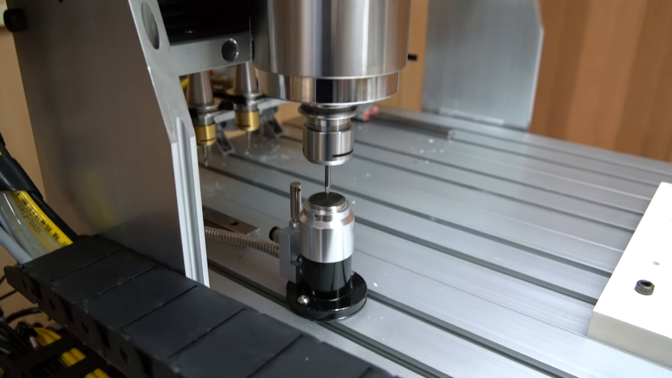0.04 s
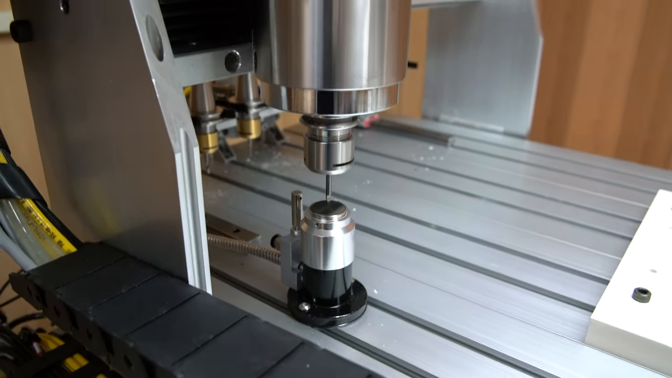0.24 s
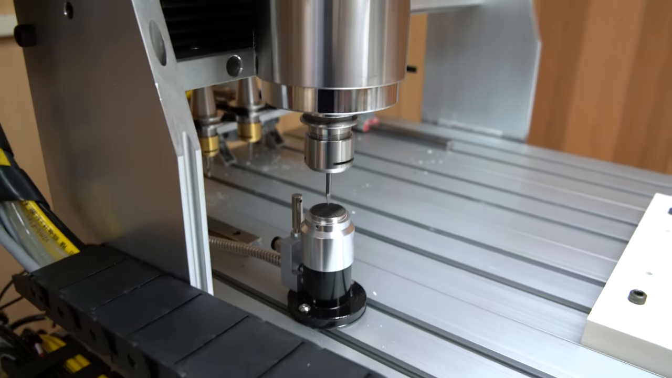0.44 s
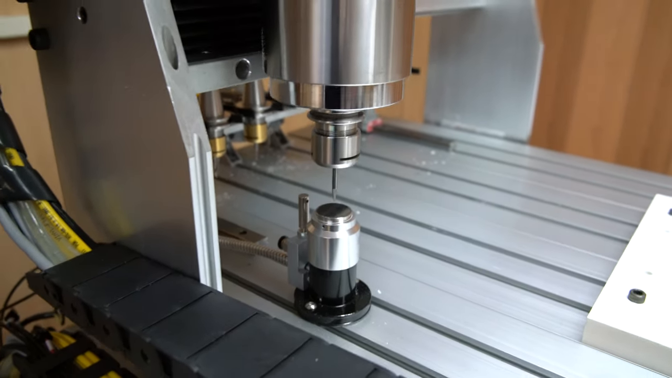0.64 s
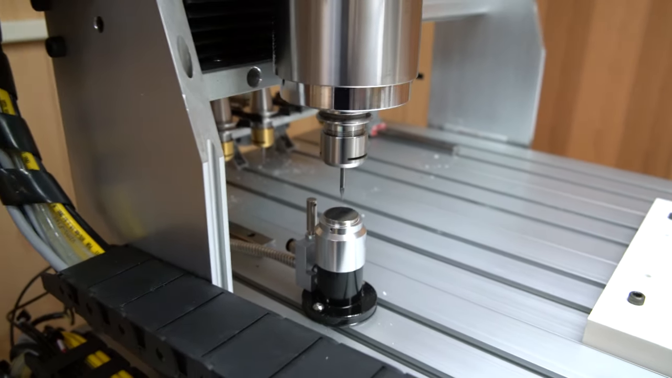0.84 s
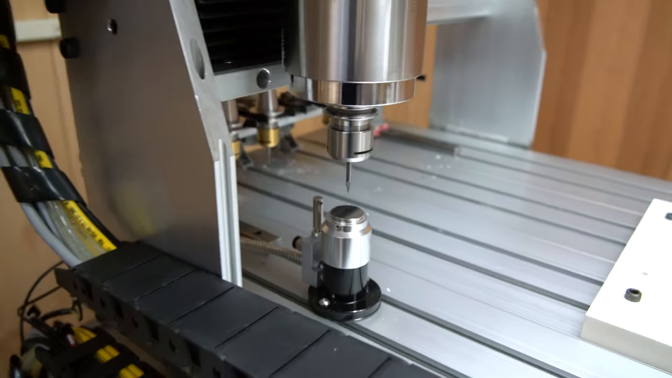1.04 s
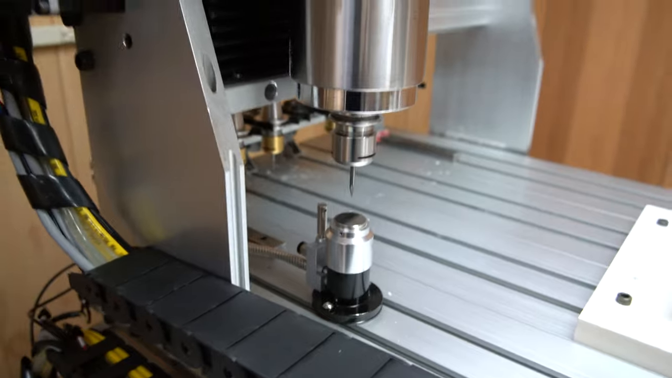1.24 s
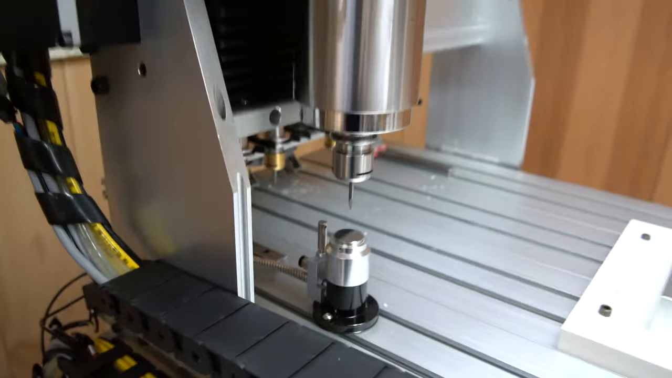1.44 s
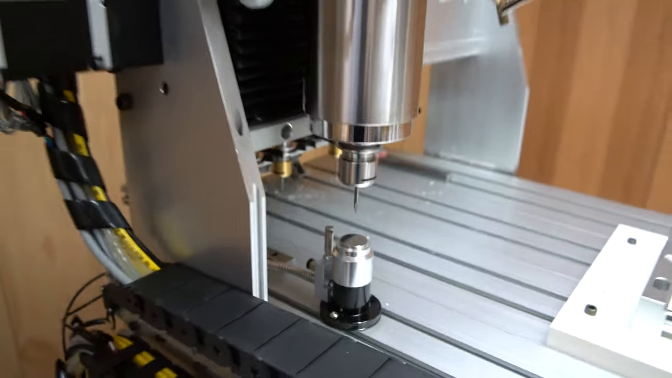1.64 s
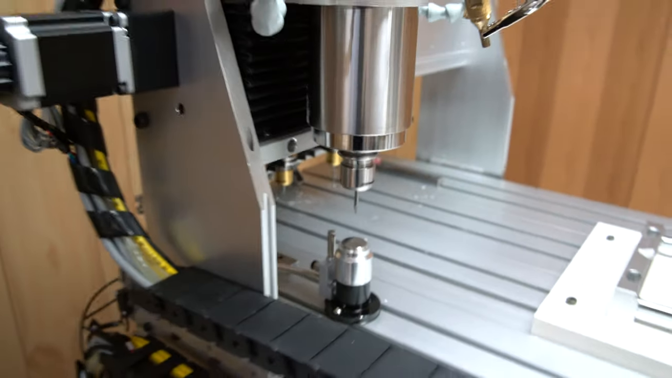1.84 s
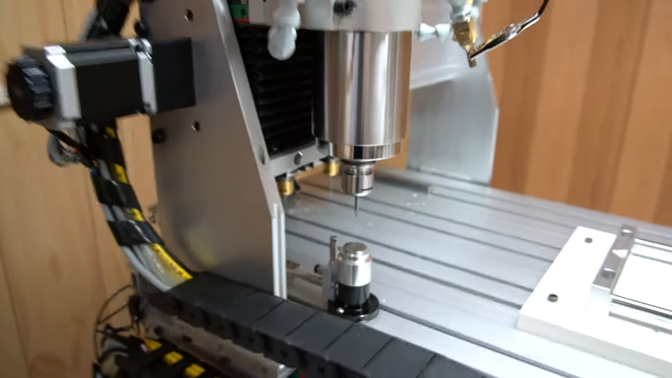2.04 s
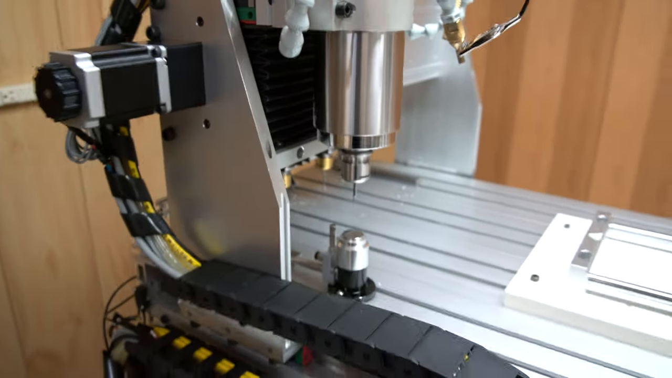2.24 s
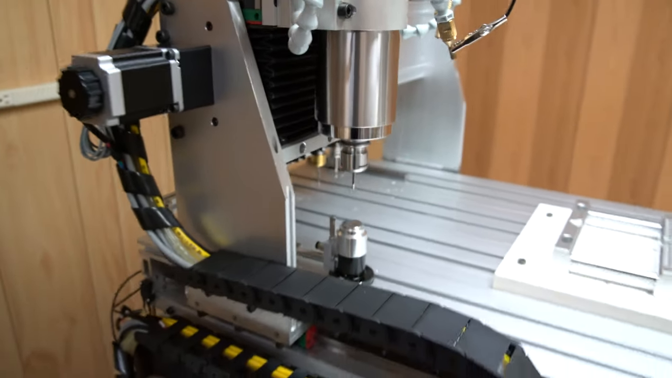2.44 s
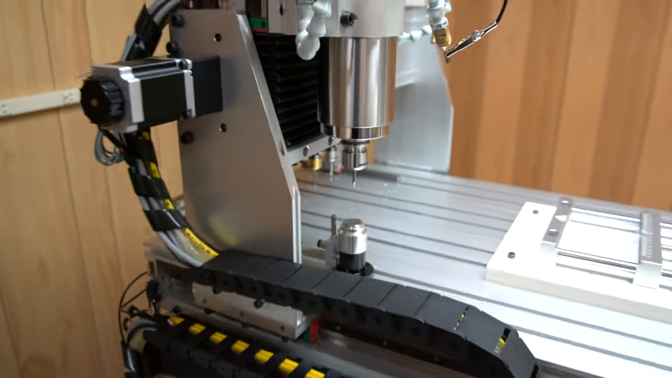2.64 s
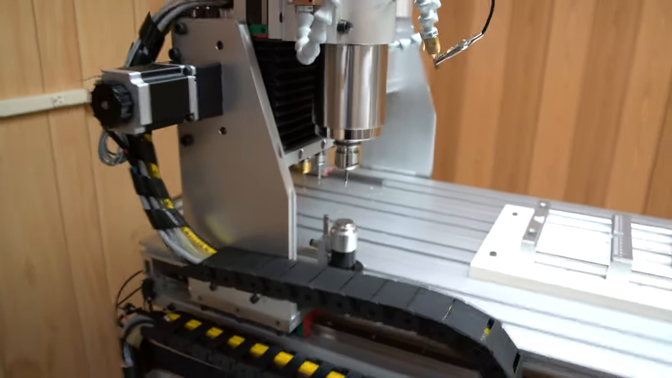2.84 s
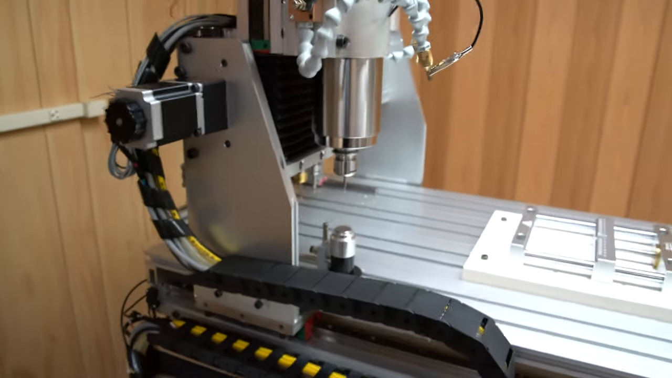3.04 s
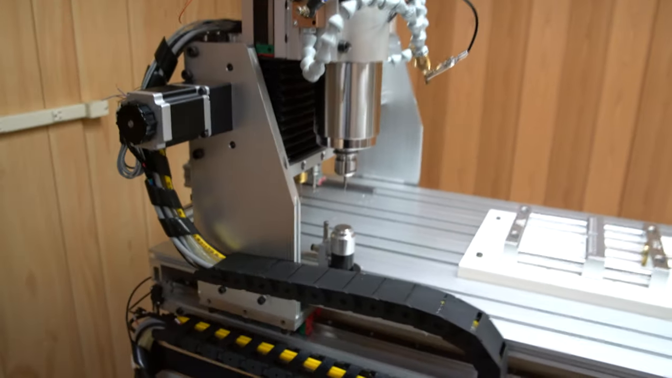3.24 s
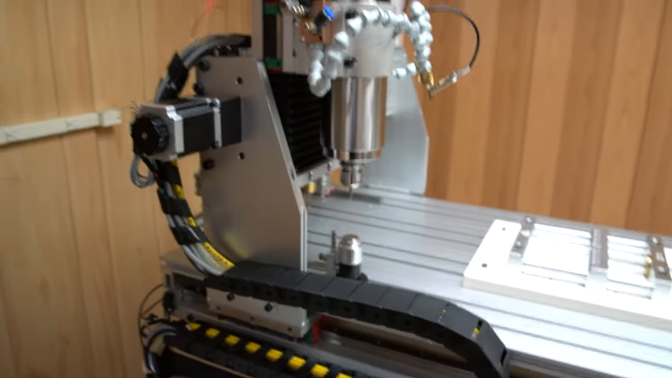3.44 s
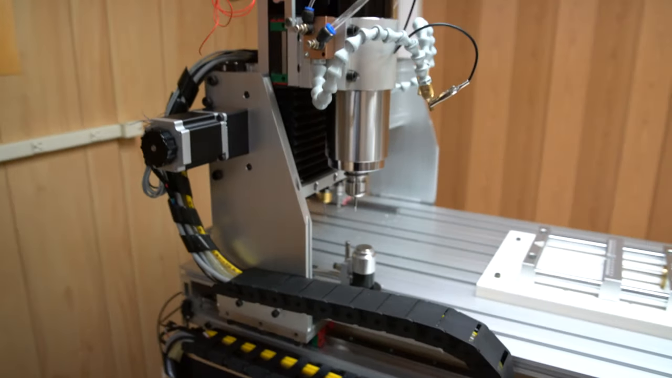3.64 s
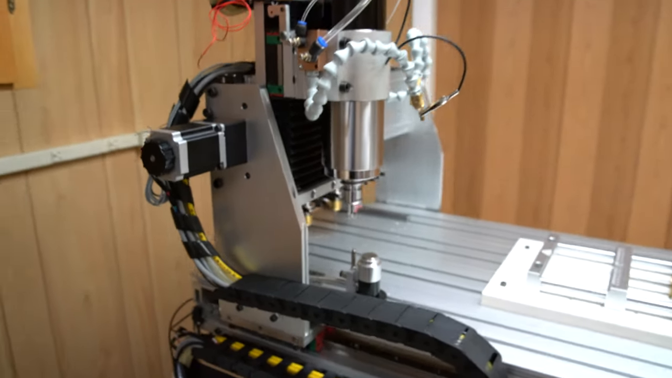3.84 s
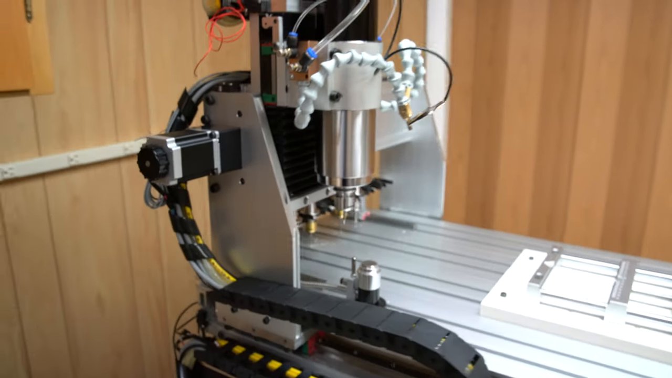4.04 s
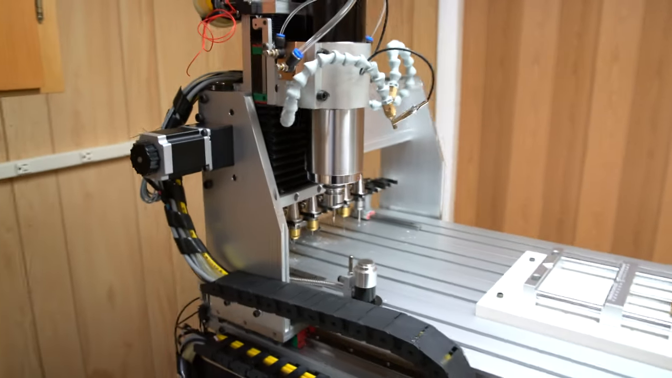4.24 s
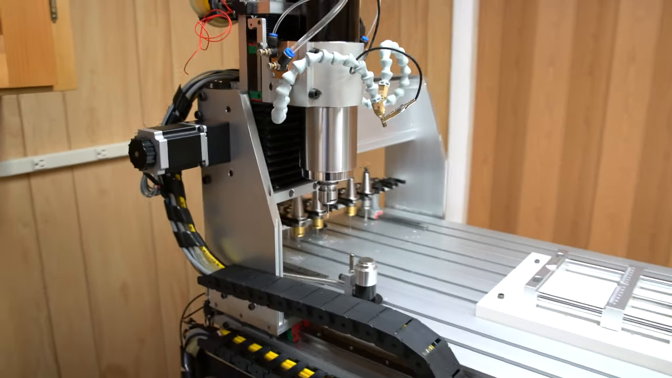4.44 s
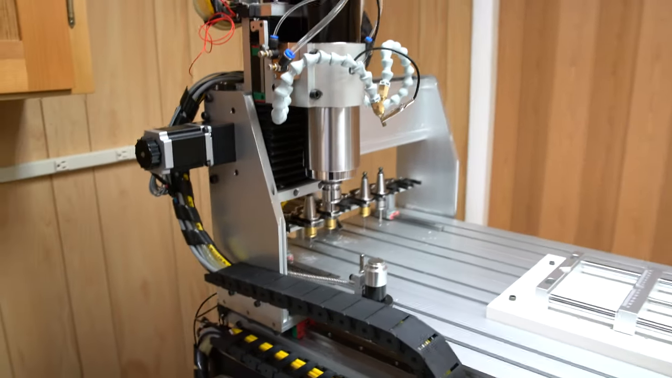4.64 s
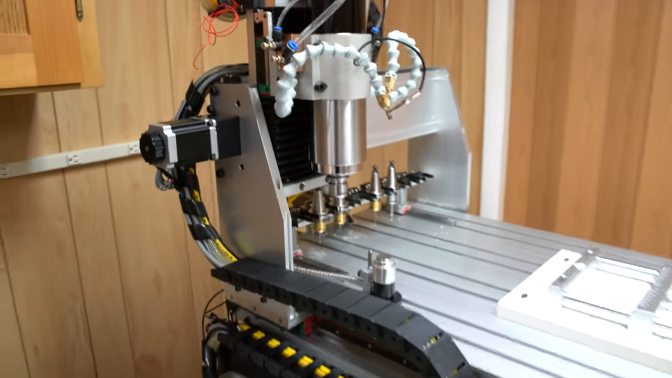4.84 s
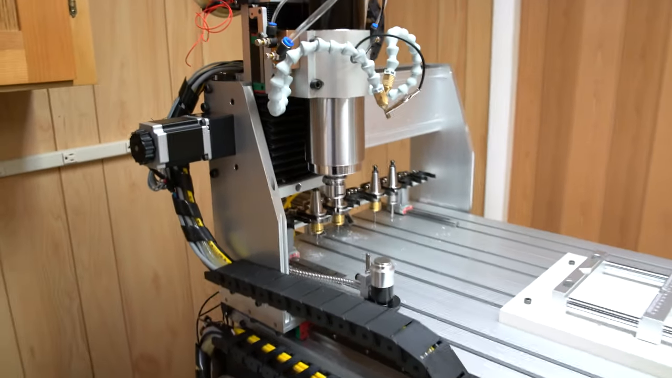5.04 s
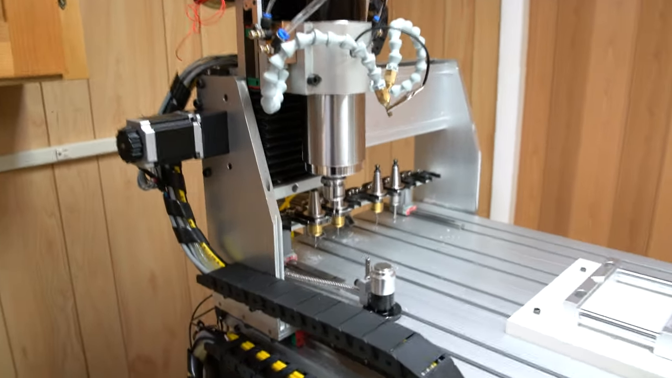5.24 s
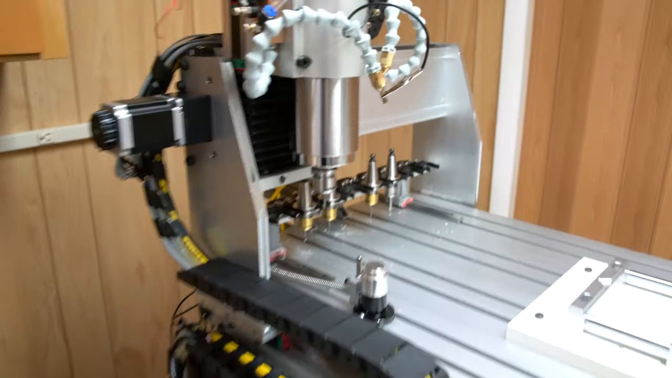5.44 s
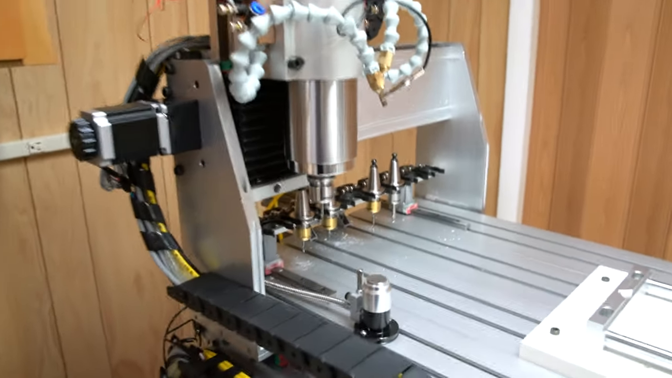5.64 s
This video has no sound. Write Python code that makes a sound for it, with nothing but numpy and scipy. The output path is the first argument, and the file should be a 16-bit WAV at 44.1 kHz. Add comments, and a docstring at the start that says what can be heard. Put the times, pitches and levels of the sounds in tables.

```python
"""A cooling fan hums in a wood-panelled workshop, close to a small CNC router just left of the right-hand side's
stronger pickup: its stepper lifts the spindle with a steady whine, then the gantry makes a fast, rattling traverse.
Motor tones are sines tied to shaft speed; air, screw and guides are shaped noise. On every speed ramp torque ripple
sweeps through the frame's resonances; jolts and clicks are short noise bursts, and thin squeaks come last."""
import sys
import numpy as np
from scipy import signal
from scipy.fft import rfft, irfft
from scipy.io import wavfile
from scipy.ndimage import uniform_filter1d

SR = 44100
rng = np.random.default_rng(int(sys.argv[2]) if len(sys.argv) > 2 else 0)


def waveform_to_disk(signal):
    """Save audio, clipped to [-1, 1], as 16-bit WAV at the path in sys.argv[1]."""
    frames = np.transpose(np.atleast_2d(signal))
    scaled = np.clip(frames, -1, 1) * 32767
    samples = np.round(scaled).astype(np.int16)
    wavfile.write(sys.argv[1], SR, samples)


N = 251370
T = np.arange(N) / SR
BINS = np.maximum(np.arange(N // 2 + 1) * SR / N, 1)  # spectrum frequencies, Hz
SIDES = np.array([[1], [-1]])  # left, right

# shaft speed of each move: t/s, share of full speed
LIFT_SPEED = [(.309, 0), (.366, 1), (3.094, 1), (3.158, 0)]
TRAVERSE_SPEED = [(3.386, 0), (3.597, 1), (4.62, 1), (4.83, 0)]
# coil frequencies at full speed, and coil cycles in one shaft turn
LIFT_COIL_HZ, TRAVERSE_COIL_HZ, CYCLES_PER_TURN = 166.64, 666.5, 50
# shudders as the gantry sets off, brakes and halts:
# t/s, growl level/dB, rattle level/dB against full speed before trim, rattle decay constant/s
SHUDDERS = [(3.4, -23.5, -4.5, 0.021), (4.761, -24.5, -21, 0.018), (4.831, -24, -8, .035)]
# stereo width of the sound field: f/Hz, side minus mid level/dB
WIDTH = [(60, -15.5), (250, -19.5), (600, -13.5), (1000, -9), (2000, -2), (4000, 0.5), (12000, 0.5)]


def undb(db):
    """Decibels to gain."""
    return 10 ** (np.asarray(db) / 20)


def curves(table):
    """Each column of a timed table, sample by sample."""
    s, *columns = np.transpose(table)
    return [np.interp(T, s, c) for c in columns]


def gain_at(points, hz):
    """Gain of a (Hz, dB) spectrum at the given frequencies."""
    f, db = np.transpose(points)
    return undb(np.interp(np.log(hz), np.log(f), db))


def walk(rate):
    """Smooth random drift, spread near 1: held random steps at the given rate in Hz, averaged twice."""
    k = int(SR / rate)
    held = np.repeat(rng.standard_normal(N // k + 2), k)[rng.integers(k):]
    return 1.3 * uniform_filter1d(uniform_filter1d(held, k), k)[:N]


def lag(drive, seconds):
    """Level of a vibration that builds up and dies away behind its drive."""
    keep = np.exp(-1 / (seconds * SR))
    return signal.lfilter([1 - keep], [1, -keep], drive)


def spread(mid, side):
    """Left and right from two unrelated signals: bass alike, treble apart."""
    return mid + SIDES * irfft(rfft(side) * gain_at(WIDTH, BINS), N)


def colour(white, points):
    """Stereo noise with a given density (Hz, dB per Hz) from a pair of white noises."""
    mid, side = irfft(rfft(white) * gain_at(points, BINS) * np.sqrt(SR / 2), N)
    return spread(mid, side)


def resonate(x, modes):
    """Sum of damped resonances (Hz, width Hz, peak dB) driven by x."""
    response = sum(undb(db) / (1 + 1j * (BINS / hz - hz / BINS) * hz / width) for hz, width, db in modes)
    return irfft(rfft(x) * response, N)


def cycles(hz):
    """Running phase in radians."""
    return 2 * np.pi * np.cumsum(hz) / SR


def tone(hz, speed, wander, rough):
    """One machine tone; the microphone drifts through its standing waves, so level and side keep shifting."""
    mid = 1 + wander * (walk(3.08) + 1j * walk(3.03)) + rough * walk(45)
    mid = mid / np.sqrt(1 + 2 * wander ** 2)
    side = gain_at(WIDTH, hz) * (0.17 * walk(3.94) + .8j * walk(2.85))
    phase = cycles(hz * speed) + rng.uniform(0, 2 * np.pi)
    return np.sqrt(2) * np.real((mid + SIDES * side) * np.exp(1j * phase))


def per_turn(coil_hz, crest_s):
    """A swing between -1 and 1, once per shaft turn, with a crest at crest_s."""
    return np.cos(2 * np.pi * (T - crest_s) * coil_hz / CYCLES_PER_TURN)


def workshop():
    """Steady fan and idle-driver hum over the broad noise of the air."""
    # fan and idle drivers: f/Hz, level/dB
    fan = [(290.7, -51), (376.8, -66), (581.4, -56), (872.1, -64), (1163, -69), (1394, -68), (1572, -70),
           (1696, -73), (3720, -81), (5787, -80), (8974, -81), (10465, -82), (12758, -83), (13108, -83),
           (15547, -86)]
    # air noise: f/Hz, density/dB per Hz
    shop = [(25, -69), (50, -73), (100, -78), (150, -83), (240, -75), (350, -80), (480, -82.5), (900, -82),
            (1500, -86.5), (2100, -94), (3500, -97), (6000, -99.5), (13000, -102), (15500, -103)]
    hum = sum(undb(db) * tone(hz, np.ones(N), wander=0.33, rough=0.13) for hz, db in fan)
    return hum + colour(rng.standard_normal((2, N)) * undb(0.31 * walk(9.9)), shop)


def lift_lead(speed):
    """The lift's three leading tones build up at full speed; the full-step tone swells with each turn."""
    # full-step tone: t/s, level/dB
    step_level = [(.55, -38), (1.3, -39.5), (1.8, -36), (2.4, -33.5), (3.05, -37)]
    # tone that beats above it: t/s, level/dB before trim
    beat_level = [(0.42, -52), (0.5, -50), (0.72, -64), (0.8, -52), (1.85, -40), (2.43, -41.5),
                  (2.49, -51.5), (2.66, -60), (2.72, -49), (3.08, -47)]
    # microstep whistle: t/s, level/dB before trim
    microstep_level = [(0.42, -60), (0.49, -56), (0.88, -63.5), (1.0, -76), (1.03, -63), (1.13, -84),
                       (1.45, -58.5), (1.72, -67), (2.27, -71), (2.35, -57.5), (3.08, -67)]
    swell_db = 1.46 * per_turn(LIFT_COIL_HZ, crest_s=2.069)
    step = undb(curves(step_level)[0] + swell_db) * tone(666.5, np.ones(N), wander=.03, rough=0.09)
    beat = undb(curves(beat_level)[0] + 1.6) * tone(776.3, np.ones(N), wander=.03, rough=0.072)
    whistle = undb(curves(microstep_level)[0] + 4.5) * tone(5332, np.ones(N), wander=0.11, rough=0.3)
    # the two lower tones die away faster than they build up
    singing = np.minimum(lag(speed ** 4, seconds=0.044), lag(speed ** 4, seconds=.014))
    return singing * (step + beat) + speed ** 20 * whistle


def chain_rustle(speed):
    """Dry rustle of the cable chain: band noise with a flickering level, stronger as the lift brakes and
    settles."""
    # rustle colour, later scaled to unit level: f/Hz, relative density/dB
    friction = [(900, -23), (1500, -8), (2200, 4.5), (3000, -2), (4200, -4), (7000, -30)]
    # it fades after the start and jumps up near the top: t/s, level/dB before trim
    rustle_level = [(.34, -52), (.5, -58), (.9, -62), (2.25, -66), (2.37, -52.5), (2.8, -53.5),
                    (3.1, -53.5)]
    brake_db = 8 * (1 - speed) * (T > LIFT_SPEED[2][0])
    grains = colour(rng.standard_normal((2, N)) * undb(3.5 * walk(70)), friction)
    return grains / np.std(grains) * undb(curves(rustle_level)[0] + brake_db - 3.5)


def screw_rumble(speed):
    """Low noise and throb of the lead screw, slowly fading and dipping at even intervals."""
    # rumble before its fade: f/Hz, density/dB per Hz
    low_noise = [(25, -67.5), (40, -69.5), (54, -62), (68, -69), (85, -60.5), (130, -84), (400, -130)]
    dip_s, dip_every_s = 1.51, .53
    dips = np.cos(np.pi * (T - dip_s) / dip_every_s) ** 20
    rumble_db = 2 - 1.1 * (T - LIFT_SPEED[0][0]) - 5 * dips
    rumble = colour(rng.standard_normal((2, N)), low_noise) * undb(rumble_db)
    throb = undb(rumble_db - 48) * tone(53.3, speed, wander=0.19, rough=0.17)
    return rumble + throb


def lift():
    """The spindle rises: step tones, a comb of driver whine, the rumbling lead screw and the rustling cable
    chain."""
    # weaker motor and driver tones at full speed: f/Hz, level/dB before trim
    lift_tones = [(1333, -63), (1629, -67), (1685, -68), (4388, -71), (4559, -66), (4665, -64), (4999, -71),
                  (5165, -66), (5499, -64), (5665, -71), (5831, -65), (5942, -68), (6106, -69), (6276, -65),
                  (6441, -77), (6719, -71), (6884, -75), (7052, -76), (8333, -77), (8439, -73), (9552, -78),
                  (9900, -77), (10053, -78), (10329, -70), (10498, -69), (10662, -70), (10829, -66),
                  (10994, -69), (11103, -67), (11275, -70), (11438, -74), (11609, -67), (11770, -63),
                  (11880, -73), (11938, -74), (12546, -69), (12654, -76), (13205, -72), (13322, -76),
                  (15662, -75)]
    # screw noise: f/Hz, density/dB per Hz
    lift_noise = [(110, -90.5), (220, -73.5), (450, -84.5), (700, -79.5), (1000, -86.5), (1500, -86.5),
                  (2000, -96.5), (3600, -103), (4500, -98), (8000, -100), (13000, -100.5), (15500, -106)]
    speed, = curves(LIFT_SPEED)
    whine = sum(undb(db) * tone(hz, speed, wander=0.83, rough=0.72) for hz, db in lift_tones)
    whine = undb(0.5) * speed ** 6 * whine
    screw = colour(rng.standard_normal((2, N)) * undb(0.51 * walk(39.98)), lift_noise)
    # the table keeps trembling for a moment after the screw stops
    trembling = np.maximum(speed, lag(speed, seconds=0.11))
    return lift_lead(speed) + whine + trembling * (screw + chain_rustle(speed) + screw_rumble(speed))


def burst(s, db, decay):
    """A short puff of contact noise that falls 60 dB in the decay time."""
    return rng.standard_normal(N) * (T >= s) * undb(db - 60 * np.maximum(T - s, 0) / decay)


def jolt(s, push_db, chatter_db, decay, contact_s=0.00017):
    """A soft push as the play in the drive closes, then brief chatter."""
    push = undb(push_db) * np.exp(-.5 * ((T - s) / contact_s) ** 2)
    return push + burst(s, chatter_db, decay)


def frame(coil_hz, speed, ripple, jolts, modes, smooth_db):
    """Torque ripple and jolts ring the frame; near full speed the coils smooth the ripple away."""
    # the rotor judders about its commanded angle, which smears the high orders into noise
    judder = speed ** .5 * (.12 * walk(2500) + .075 * walk(250))
    phase = cycles(coil_hz * speed) + judder
    force = sum(np.sqrt(2) * undb(db) * np.sin(k * phase) for k, db in ripple)
    force = force * np.minimum(10 * speed, 1) * undb(smooth_db * speed ** 20)
    return resonate(force + sum(jolt(*row) for row in jolts), modes)


def carriage():
    """The spindle carriage rings as the lift's torque ripple and jolts pass through its resonances."""
    # torque ripple before smoothing: multiple of the coil frequency, level/dB
    ripple = [(4, -29.5), (32, -32)]
    # jolts as it takes up or loses speed: t/s, push/dB, chatter/dB, time to fall 60 dB/s
    jolts = [(.317, -10, -20.5, 0.15), (3.141, -33, -30, 0.93)]
    # resonances: f/Hz, width/Hz, peak gain/dB
    modes = [(774, 57, -5), (987, 56, 6), (1125, 110, -7), (1600, 94, -25), (2920, 20, -8.5),
             (4330, 165, -10), (4620, 100, -9.5), (6900, 810, -33), (13200, 600, -24)]
    return frame(LIFT_COIL_HZ, curves(LIFT_SPEED)[0], ripple, jolts, modes, smooth_db=-14)


def clicks():
    """Small clicks, most at the stops, as of couplings and cable chain: noise bursts through one resonance."""
    # t/s, burst level/dB before the resonance, centre f/Hz, width/Hz, time to fall 60 dB/s
    click_table = [(2.295, -30.5, 3300, 1200, 0.027), (2.611, -37, 3200, 2500, .04),
                   (3.131, -33, 8000, 11000, 0.023), (3.132, -37, 3000, 5000, 0.074),
                   (4.807, -35, 4970, 12000, 0.1), (4.823, -47, 10000, 9000, 0.29),
                   (4.938, -38, 10100, 5000, 0.013), (4.984, -45, 6500, 3000, 0.025),
                   (5.132, -48, 10000, 5000, 0.13), (5.162, -47, 9000, 6000, .06),
                   (5.333, -49, 8500, 3000, .05)]
    return sum(resonate(burst(s, db, decay), [(hz, width, 0)]) for s, db, hz, width, decay in click_table)


def braking():
    """1 while the gantry slows down, else 0, with soft edges."""
    slowing = (T > TRAVERSE_SPEED[2][0]) & (T < TRAVERSE_SPEED[3][0])
    return lag(1. * slowing, seconds=.005)


def gantry():
    """The gantry frame rings from torque ripple and jolts, louder while it brakes."""
    # torque ripple before smoothing: multiple of the coil frequency, level/dB
    ripple = [(1, -27.5), (2, -34), (3, -26.5), (4, -23), (8, -37.5), (32, -33.5)]
    # jolts as it takes up or loses speed: t/s, push/dB, chatter/dB, time to fall 60 dB/s
    jolts = [(3.383, -3, -28, 0.042), (4.612, -2, -26, .015), (4.779, -10, -28, .04),
             (4.829, -1, -19, 0.044)]
    # resonances before the braking gain: f/Hz, width/Hz, peak gain/dB
    modes = [(309, 14, -14), (438, 10.5, -9), (651, 18, -1), (894, 22, -27), (980, 48, -9), (1490, 23, -25),
             (1826, 93, -8), (2113, 47, -2.5), (2270, 290, -15.5), (4540, 1100, -15), (7240, 4800, -25.5),
             (12000, 860, -20)]
    ringing = frame(TRAVERSE_COIL_HZ, curves(TRAVERSE_SPEED)[0], ripple, jolts, modes, smooth_db=-21)
    return ringing * undb(2.5 * braking())


def shudder(s, fall_s):
    """Envelope that rises quickly to 1 at s and dies away."""
    rise_s = 0.0036
    return np.exp(-(np.minimum(T - s, 0) / rise_s) ** 2 - np.maximum(T - s, 0) / fall_s)


def growl():
    """The gantry's main mode, shaken by coil harmonics sweeping through it and by the shudders."""
    # harmonics that shake it: multiple of the coil frequency, level/dB speeding up, level/dB braking
    growl_orders = [(2, -24, -30), (3, -22, -44), (4, -21.5, -24), (8, -26, -18)]
    mode_hz, width_hz = 901, 91
    speed, = curves(TRAVERSE_SPEED)
    slowing = T > TRAVERSE_SPEED[2][0]
    drive = np.zeros(N)
    for k, up_db, down_db in growl_orders:
        closeness = np.exp(-((k * TRAVERSE_COIL_HZ * speed - mode_hz) / width_hz) ** 2)
        drive += undb(np.where(slowing, down_db, up_db)) * closeness
    swing = lag(drive, seconds=0.018) + sum(undb(db) * shudder(s, fall_s=0.0036) for s, db, _, _ in SHUDDERS)
    # a weaker, slower ring outlasts the growl
    swing = swing + undb(-5) * lag(swing, seconds=0.054)
    return swing * tone(mode_hz, 1 + 0.012 * walk(150), wander=.03, rough=0.2)


def traverse_lead(speed):
    """The gantry's leading tones build up near full speed and ring on briefly; the coil tone throbs each turn."""
    # multiples of the coil frequency
    harmonics = (4, 5, 7)
    # their levels before trim: t/s, fourth level/dB, fifth level/dB, seventh level/dB
    harmonic_levels = [(3.62, -39.5, -65, -60), (3.8, -47, -71, -56.5), (3.93, -45.5, -66, -51),
                       (4.07, -39.5, -58, -62), (4.22, -40.5, -55, -70), (4.33, -46, -57, -64),
                       (4.46, -39, -61, -70), (4.6, -37.5, -60, -65)]
    howl = undb(-26) * tone(824.7, np.ones(N), wander=0.052, rough=.08)
    coil_db = -34 + 2 * per_turn(TRAVERSE_COIL_HZ, crest_s=4.14)
    coil = undb(coil_db) * tone(TRAVERSE_COIL_HZ, np.ones(N), wander=0.22, rough=0.13)
    upper = sum(undb(db + 3.0) * tone(k * TRAVERSE_COIL_HZ, np.ones(N), wander=0.065, rough=0.13)
                for k, db in zip(harmonics, curves(harmonic_levels)))
    return lag(speed ** 20, seconds=.016) * (howl + coil + upper)


def gantry_rattle(speed):
    """Contact noise of screw and guides that partly repeats each shaft turn and grows as a power of speed."""
    # rattle at full speed before trim: f/Hz, density/dB per Hz
    traverse_noise = [(30, -72), (80, -62.5), (140, -71.5), (310, -68.5), (530, -69), (640, -59),
                      (800, -59.5), (1100, -61.5), (1500, -70.5), (1800, -69.5), (2300, -78), (3400, -85.5),
                      (4400, -84), (6000, -92), (12000, -95), (15500, -100)]
    repeat = 0.59  # share of the power that repeats
    turn = int(SR * CYCLES_PER_TURN / TRAVERSE_COIL_HZ)  # samples
    repeated = rng.standard_normal((2, turn))[:, np.arange(N) % turn]
    fresh = rng.standard_normal((2, N))
    contacts = np.sqrt(repeat) * repeated + np.sqrt(1 - repeat) * fresh
    rattle = colour(contacts * undb(1.53 * walk(250) - 1.65), traverse_noise)
    drive = speed ** 0.92
    # the rattle takes a moment to settle
    shaking = np.maximum(drive, lag(drive, seconds=0.067))
    shaking = shaking + sum(undb(db) * shudder(s, fall_s) for s, _, db, fall_s in SHUDDERS)
    # 1 dB more while braking
    return undb(0.58 + braking()) * shaking * rattle


def traverse():
    """The gantry runs fast: howling motor tones and a low hum over the rattle."""
    # weaker motor tones at full speed: f/Hz, level/dB
    traverse_tones = [(314, -45), (635, -35.5), (985, -42), (1016, -41.5), (1456, -55.5), (1650, -49),
                      (1788, -47), (1933, -59), (1987, -56), (2000, -55), (2013, -54), (2652, -48),
                      (2680, -48.5), (3998, -65.5), (4316, -60), (5333, -82), (5999, -77), (6666, -68),
                      (7999, -73), (15488, -73)]
    # low hum at full speed: f/Hz, level/dB
    gantry_hum = [(91.5, -52), (145.3, -52), (193.8, -53), (290.7, -46), (387.6, -53.5), (484.5, -56)]
    speed, = curves(TRAVERSE_SPEED)
    whine = sum(undb(db) * tone(hz, speed, wander=0.68, rough=0.4) for hz, db in traverse_tones)
    hum = sum(undb(db) * tone(hz, speed, wander=0.59, rough=0.15) for hz, db in gantry_hum)
    return traverse_lead(speed) + speed ** 8 * whine + speed ** 2 * hum + gantry_rattle(speed)


def squeaks():
    """Faint, thin whistles whose unsteady pitch glides along a bend."""
    # t/s, length/s, start f/Hz, middle f/Hz, end f/Hz, peak level/dB
    squeak_table = [(5.385, 0.16, 8500, 10300, 11100, -62), (5.49, 0.072, 10100, 10850, 11100, -56),
                    (5.493, 0.14, 11900, 13100, 11900, -58), (5.536, .065, 9050, 8950, 8450, -55.5),
                    (5.574, 0.086, 10100, 9550, 9200, -58), (5.64, .06, 11200, 10900, 10200, -62)]
    out = np.zeros(N)
    for s, length, start_hz, middle_hz, end_hz, db in squeak_table:
        u = np.clip((T - s) / length, 0, 1)
        bend = np.polyfit([0, .5, 1], [start_hz, middle_hz, end_hz], 2)
        hz = np.polyval(bend, u) * (1 + .007 * walk(600))
        out += undb(db) * np.sin(np.pi * u) * np.sin(cycles(hz))
    return out


def room(x, t60=0.26, wet_db=-7):
    """Direct sound and the short echo of panelled walls, a decaying noise tail (t60 in s)."""
    tail = rng.standard_normal((2, N)) * (T > .003) * undb(-60 * T / t60)
    tail = tail[:, :SR] / np.sqrt(np.sum(tail[0] ** 2))
    mid, side = signal.fftconvolve(x[None], tail, axes=1)[:, :N]
    return spread(x + undb(wet_db) * mid, undb(-3.5) * side)


def scene():
    """Both moves, the ringing frame and the small noises in the workshop."""
    echoing = room(carriage() + clicks() + gantry() + squeaks())
    return workshop() + lift() + growl() + traverse() + echoing


def record(dry, balance_db=-0.95):
    """The machine stands a little to the right of the microphone; a steep low-pass cuts the top."""
    low_pass = signal.ellip(10, .2, 80, 15800, fs=SR, output="sos")
    return signal.sosfilt(low_pass, dry * undb(SIDES * balance_db / 2))


dry = scene()
out = record(dry)
waveform_to_disk(out)
```